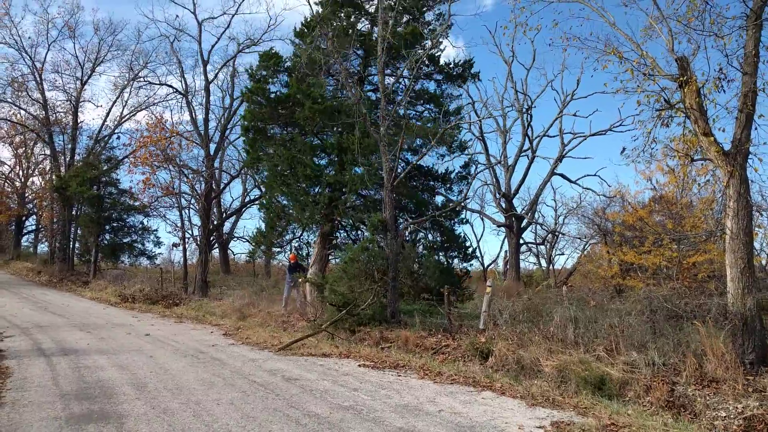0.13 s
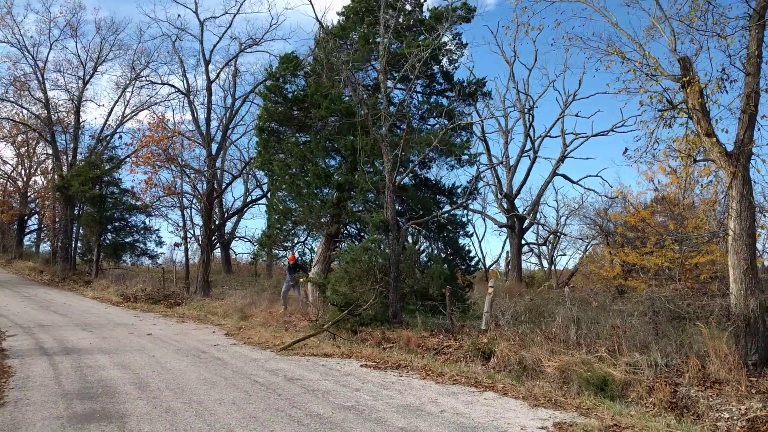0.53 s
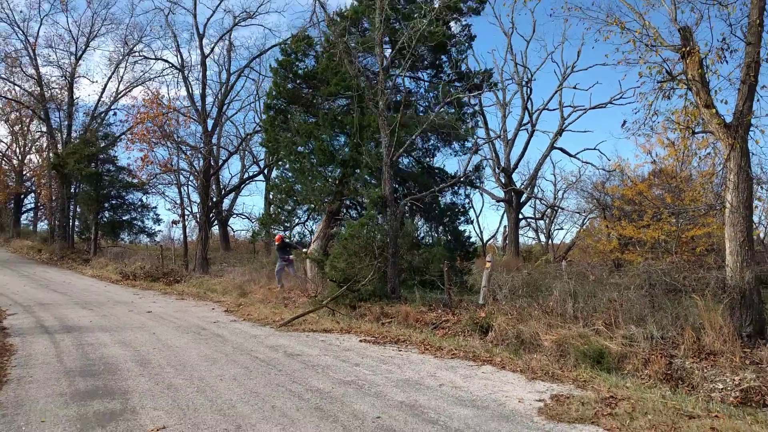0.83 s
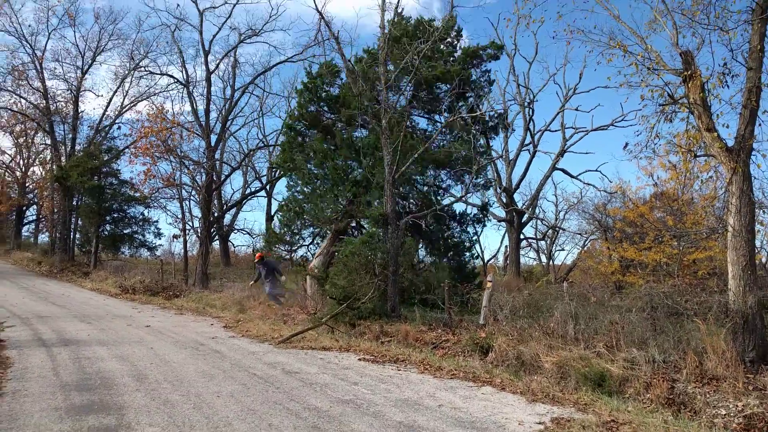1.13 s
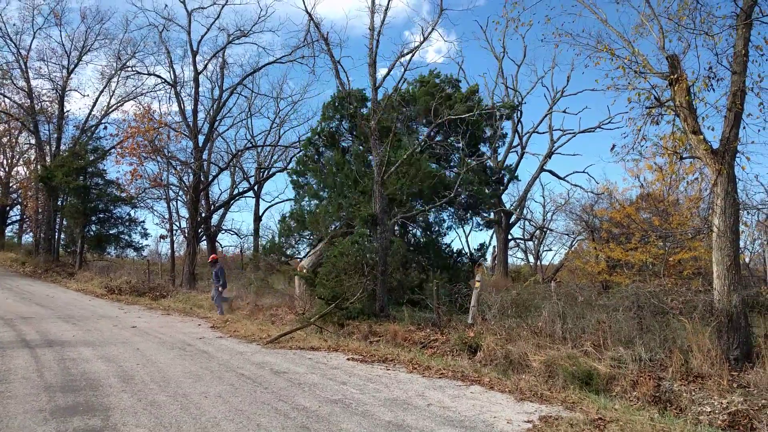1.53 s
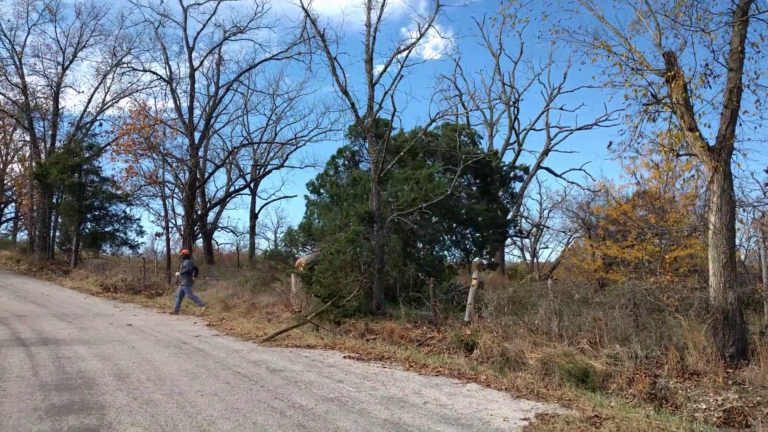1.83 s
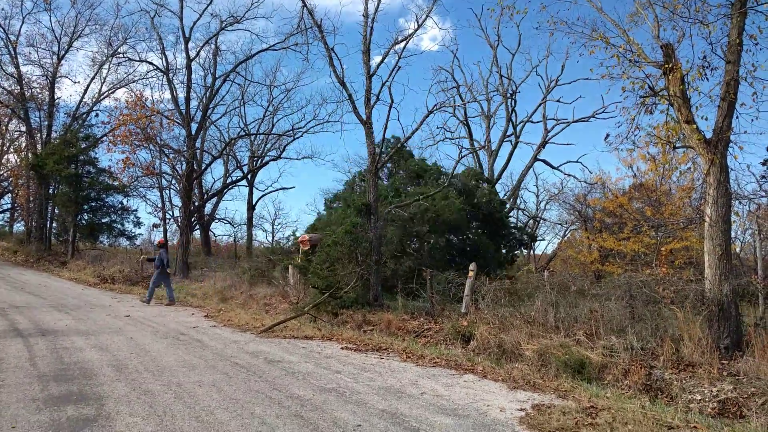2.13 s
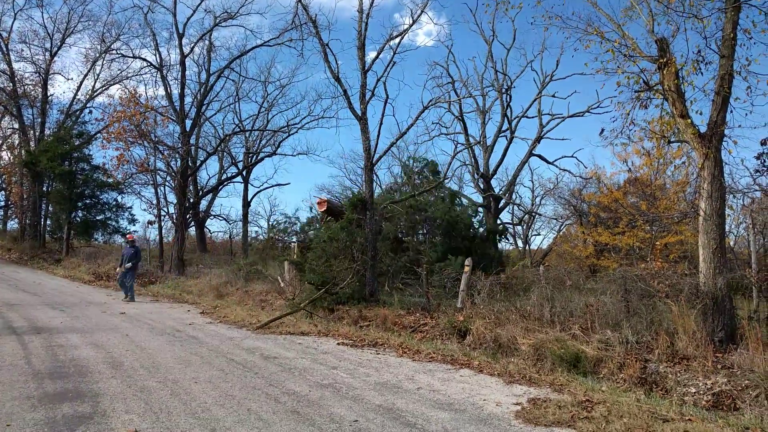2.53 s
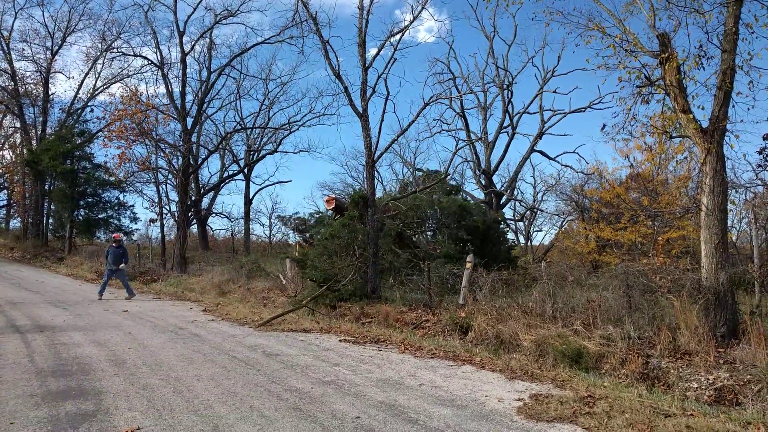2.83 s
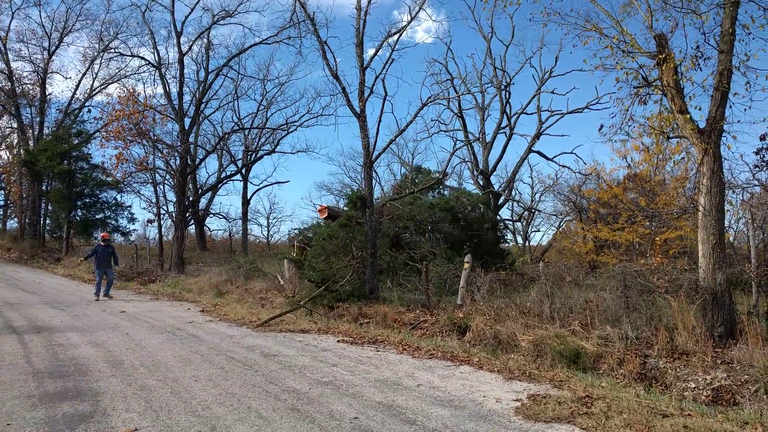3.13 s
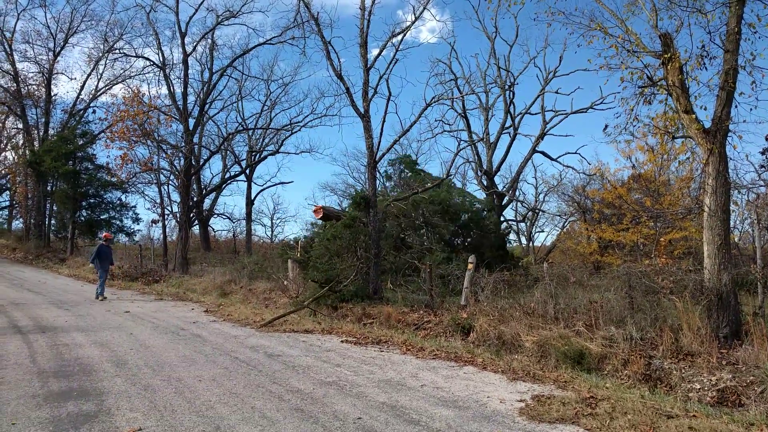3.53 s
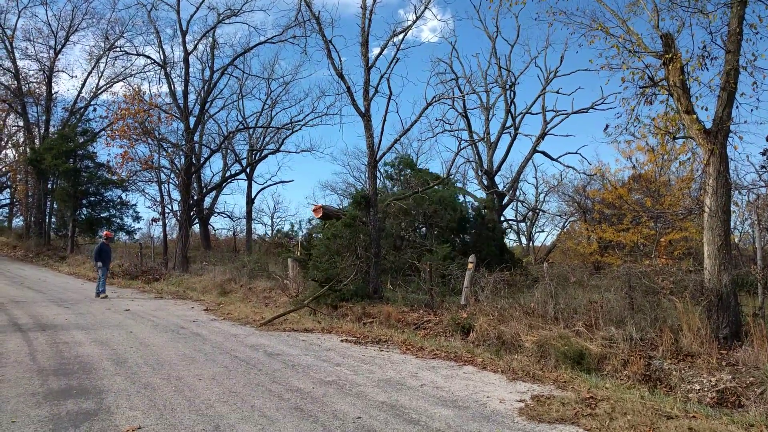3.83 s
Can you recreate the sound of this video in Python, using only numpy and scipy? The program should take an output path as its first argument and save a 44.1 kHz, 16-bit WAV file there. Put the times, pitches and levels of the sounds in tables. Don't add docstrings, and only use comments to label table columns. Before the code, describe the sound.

A tree cracks, creaks and crashes down after a chainsaw finishes its cut outdoors

```python
import sys
import numpy as np
from scipy import signal
from scipy.fft import rfft, irfft, next_fast_len
from scipy.io import wavfile
from scipy.ndimage import map_coordinates

SR = 44100
rng = np.random.default_rng(int(sys.argv[2]) if len(sys.argv) > 2 else 0)


def invert_db(level):
    return 10 ** (np.asarray(level, dtype=float) / 20)


def wav_out(sig):
    wavfile.write(sys.argv[1], SR, np.round(np.clip(np.atleast_2d(sig).T, -1, 1) * 32767).astype(np.int16))


N = 176400


def unit(x):
    return x / np.sqrt(np.mean(x ** 2) + 1e-20)


def loud_unit(x, gate):
    return gate ** 2 * x / np.sqrt(np.sum(gate * x ** 2) / np.sum(gate))


def curves(rows, fade_s=0.0062):
    s, *cols = np.transpose(rows)
    t = np.arange(N) / SR
    fade_in = np.clip((t - s[0]) / fade_s + 1, 0, 1)
    fade_out = np.clip((s[-1] - t) / fade_s + 1, 0, 1)
    return [np.interp(t, s, c) for c in cols] + [fade_in * fade_out]


def wobble(rate_hz):
    knots = rng.standard_normal(int(N * rate_hz / SR) + 4)
    return map_coordinates(knots, [np.arange(N) * rate_hz / SR])


def white():
    return rng.standard_normal(N)


def filtered(x, response):
    m = 2 * next_fast_len(len(x) // 2 + 4096)
    return irfft(rfft(x, m) * response(np.fft.rfftfreq(m, 1 / SR)), m)[:len(x)]


def colour(points):
    def response(hz):
        f, db = np.transpose(points)
        level_db = np.interp(np.log(hz + 1), np.log(f + 1), db)
        cepstrum = irfft(np.log(invert_db(level_db) + 1e-6))
        cepstrum[1:len(hz) - 1] *= 2
        cepstrum[len(hz):] = 0
        return np.exp(rfft(cepstrum))
    return response


def band(f, centre_hz, width_hz):
    return 1j * f * width_hz / (centre_hz ** 2 - f * f + 1j * f * width_hz)


def resonances(peaks):
    def response(f):
        return sum((-1) ** k * invert_db(db) * band(f, hz, width) for k, (hz, width, db) in enumerate(peaks))
    return response


def pulses(rate_hz, jitter, scatter_db):
    turns = np.cumsum(rate_hz) / SR
    chance = rng.standard_normal((1200, 2))[:int(turns[-1])]
    at = np.interp(np.arange(len(chance)) + .5, turns, np.arange(N))
    shift = chance[:, 0] * np.interp(at, np.arange(N), jitter / rate_hz) * SR
    at = np.clip(at + shift, 8, N - 9)
    k = np.arange(-7, 9)
    taps = np.sinc(k - (at % 1)[:, None]) * np.hanning(18)[1:-1] * invert_db(scatter_db * chance[:, 1:])
    clicks = np.bincount((at.astype(int)[:, None] + k).ravel(), taps.ravel(), N)
    return clicks, 2 * np.pi * turns


# (time [s], firing rate [Hz], first order [dB], rasp [dB])
SAW_CUT = [
    (0, 182.6, -23.5, -15),
    (.2, 174.5, -25, -16.5),
    (.39, 170.2, -29, -17.5),
    (.48, 166.2, -23, -18.5),
    (.56, 174.6, -27, -15.5),
    (.62, 181.5, -22, -25.5),
    (.68, 189, -40, -15),
]
# (frequency [Hz], level [dB])
SAW_COLOUR = [(560, -9), (900, -8), (1200, -4), (1900, -6), (2700, -4), (4240, -12.5), (6400, -31),
              (16000, -58)]


def saw():
    chain_hz, slap_s, noise_db = 1500, .0008, -7
    hz, one_db, rasp_db, gate = curves(SAW_CUT, fade_s=.04)
    clicks, phase = pulses(hz, .004, scatter_db=1.5)
    slap = (.5 + .2 * wobble(12.15)) * np.roll(clicks, round(slap_s * SR))
    barks = unit(clicks + slap)
    chain = filtered(white() * (1 + np.cos(phase)), lambda f: f / (f - 1j * chain_hz))
    rasp = loud_unit(filtered(barks + invert_db(noise_db) * chain, colour(SAW_COLOUR)), gate)
    orders_db = (0, -12, -2.5, -19)
    low = invert_db(one_db) * sum(invert_db(db) * np.sin(k * phase) for k, db in enumerate(orders_db, 1))
    return invert_db(rasp_db - 2.5) * rasp + np.sqrt(2) * gate * low


# (time [s], peak [dB], centre [Hz], length [s])
TRUNK_BREAKS = [
    (0.468, -4.5, 1170, 0.0081),
    (0.569, -8.5, 1397, 0.011),
    (0.597, 8, 2010, 0.0056),
    (0.749, 3, 1928, 0.0023),
    (0.764, 7.5, 1280, 0.0033),
    (0.827, -12.5, 1300, 0.0074),
    (0.832, 7, 900, 0.0074),
    (0.865, -22, 1486, 0.0025),
    (0.9, 8, 1368, 0.0033),
]
# (time [s], peak [dB], centre [Hz], length [s])
BRIGHT_SPLITS = [(1.1615, 1, 5060, 0.00067), (1.329, -4, 4140, 0.0012), (1.3553, -19, 3780, 0.0012),
                 (1.3946, 0.5, 4700, 0.0033), (1.4252, -4, 4340, 0.00084), (1.6175, -7.5, 3700, 0.002),
                 (1.2026, -20, 4000, 0.0011), (1.4586, -21, 4000, .001), (2.688, -22, 4040, .002),
                 (3.075, -29.5, 4200, .001), (2.7023, -13, 3960, 0.0049), (3.1285, -12.5, 3900, 0.0051)]
# (time [s], peak [dB], length [s])
BRANCH_BREAKS = [(1.5487, -7, .002), (1.583, -2, 0.0069), (1.655, -7, 0.0015), (1.703, -9, 0.0036),
                 (1.736, 0.5, 0.003), (1.768, -4, 0.0024), (1.793, 3, 0.004), (1.81, 2.5, 0.0012),
                 (1.831, 7.5, 0.0044), (1.886, 1, 0.005), (1.899, -4, 0.0075), (1.949, 0.5, 0.0019),
                 (1.997, -5.5, 0.0065), (2.002, 1.5, 0.0036), (2.013, -8, 0.029), (2.038, 8, 0.002),
                 (2.049, -7.5, 0.0049), (2.079, -10.5, 0.0029), (2.109, -3.5, 0.0049),
                 (2.166, -6.5, 0.0056), (2.1874, 3, 0.0057), (2.216, -4, 0.0033), (2.237, -0.5, 0.0027),
                 (2.248, 0.5, 0.015), (2.2793, -2.5, 0.0066), (2.332, -2, 0.0067), (2.353, -5.5, 0.013),
                 (2.424, -5.5, 0.0066), (2.495, -13, 0.0077), (2.545, -9, 0.01), (2.745, -13.5, 0.004),
                 (2.851, -13, 0.0055), (2.864, -19, 0.0077), (2.938, -15, 0.0059), (3.095, -15, 0.017),
                 (3.161, -15.5, 0.0038), (3.315, -27, 0.0057)]
# (frequency [Hz], level [dB])
SNAP_COLOUR = [(180, -40), (300, -3), (2140, -0.5), (4230, -5.5), (6520, -23.5), (10600, -37.5),
               (16000, -51.5)]


def cracks(rows, ring_db, gain_db, low_hz=0):
    rise_s, tail_s, tail_db, first_click = 0.00023, 0.042, -24.5, 5
    out, t = np.zeros(N + SR), np.arange(8192) / SR
    rise = 1 - np.exp(-t / rise_s)

    def wood(f):
        return colour(SNAP_COLOUR)(f) * ((f + 1) / (f + 1 - 1j * low_hz)) ** 2

    for s, db, hz, length_s in rows:
        splinters = rng.standard_normal(len(t)) * rise * np.exp(-t / max(length_s, .0006))
        splinters[round(SR / 2000)] = first_click
        burst = filtered(splinters, lambda f: wood(f) * (1 + invert_db(ring_db) * band(f, hz, .4 * hz)))
        echoes = unit(filtered(rng.standard_normal(len(t)), lambda f: wood(f) / (1 + 1j * f / 5000)))
        tail = echoes * rise * np.exp(-t / tail_s)
        out[round(s * SR):][:len(t)] += invert_db(db + gain_db) * (burst / np.abs(burst).max() + invert_db(tail_db) * tail)
    return out[:N]


def breaks():
    thin_hz, branch_hz, spread_db = 1300, 2237, 1
    trunk = cracks(TRUNK_BREAKS, ring_db=4, gain_db=1.5)
    splits = cracks(BRIGHT_SPLITS, ring_db=14, gain_db=1.5, low_hz=thin_hz)
    rows = [(s, db, branch_hz * invert_db(spread_db * rng.normal()), d) for s, db, d in BRANCH_BREAKS]
    branches = cracks(rows, ring_db=-5.5, gain_db=0.5, low_hz=thin_hz)
    return trunk + splits + branches


# (time [s], slip rate [Hz], level [dB], unevenness [0-1])
TEAR_SLIPS = [
    (.62, 85, -19, 0.4),
    (.88, 96, -43.5, 0.2),
    (.93, 150, -19.5, 0.4),
    (1.02, 225, -18.5, .25),
    (1.1, 200, -20, .3),
    (1.17, 215, -23.5, 0.16),
    (1.24, 400, -26.5, 0),
]
# (centre [Hz], width [Hz], level [dB])
HINGE_RINGS = [(876, 1150, -3.5), (1457, 700, 1), (1894, 560, 1), (4200, 1200, -14.5)]


def tear():
    wood = resonances(HINGE_RINGS)
    rate_hz, db, uneven, gate = curves(TEAR_SLIPS)
    clicks, _ = pulses(rate_hz, uneven, scatter_db=2)
    slips = filtered(clicks, lambda f: wood(f) ** 2) / np.sqrt(rate_hz)
    return invert_db(db) * loud_unit(slips, gate)


# (time [s], slip rate [Hz], first order [dB], second order [dB], upper orders [dB], fifth order [dB])
CREAK_SLIPS = [(.94, 94.5, -52, -28.5, -26.5, -47.5), (1.05, 97.07, -44.5, -21.5, -19.5, -43),
               (1.09, 118.3, -28.5, -32.5, -21.5, -55), (1.14, 150.5, -37, -36, -22, -36),
               (1.204, 174.4, -28.5, -30.5, -20.5, -22.5), (1.26, 182.9, -24.5, -33, -27, -26),
               (1.325, 195.3, -24.5, -30.5, -20.5, -24), (1.39, 197.3, -29, -34, -27, -28.5),
               (1.47, 198.8, -29.5, -22.5, -27, -31), (1.53, 196.5, -30, -37, -38.5, -27.5),
               (1.585, 203.6, -34, -36, -38.5, -31.5), (1.625, 219.7, -29, -37, -37, -54),
               (1.67, 237.5, -36, -36, -39, -49.5), (1.72, 247.3, -42, -54, -44.5, -50.5),
               (1.92, 237.6, -38, -39, -47.5, -50.5)]
# (centre [Hz], width [Hz], level [dB])
STUMP_RINGS = [(585, 140, -5), (1300, 400, 0), (1780, 380, -2)]


def creak():
    stump = resonances(STUMP_RINGS)
    hz, one_db, two_db, top_db, five_db, gate = curves(CREAK_SLIPS)
    clicks, phase = pulses(hz, 0.0017, scatter_db=0.0)
    rings = filtered(clicks, lambda f: stump(f) * np.abs(stump(f)) ** .5) / np.sqrt(hz)
    tops = invert_db(top_db + 2 + 1.2 * wobble(15)) * loud_unit(rings, gate)
    low = sum(invert_db(db) * np.sin(k * phase) for k, db in ((1, one_db), (2, two_db), (5, five_db)))
    return tops + np.sqrt(2) * gate * low


# (time [s], peak [dB])
FIBRE_SNAPS = [(0.116, -11), (0.15, -10), (0.1884, -10), (0.2863, -10.5), (0.3394, -13.5), (0.4094, -9.5),
               (0.4437, -10.5), (0.5044, -10), (0.5267, -10.5), (0.5387, -14), (0.6128, -0.5), (0.6234, -4),
               (0.6393, -13.5), (0.6516, -19), (0.6742, -9), (0.6893, -20), (0.7008, -8.5), (0.7123, -11),
               (0.7257, -2.5), (0.7352, -5.5), (0.778, -13.5), (0.789, -19.5), (0.8014, -14.5),
               (0.8167, -5), (0.8566, -7.5), (0.876, -11), (0.8848, -3), (0.9117, 1), (0.9204, -5.5),
               (0.9285, -6), (0.9424, -3), (0.9475, -4.5), (0.9543, 2), (0.9635, -4), (0.9701, -5),
               (0.976, -12), (0.9811, -8.5), (0.986, -9), (0.992, -15), (0.9971, -7.5), (1.0175, -9),
               (1.0174, -4), (1.027, -7.5), (1.0475, -9.5), (1.068, -15)]


def fibres():
    ring_hz, ring_s, snap_db = 1380, .0013, -7
    out, t = np.zeros(N + SR), np.arange(1024) / SR
    for s, db in FIBRE_SNAPS:
        shape = t / ring_s * np.exp(1 - t / ring_s)
        ring = np.sin(2 * np.pi * ring_hz * invert_db(.5 * rng.normal()) * t) * shape ** 2
        snap = unit(filtered(rng.standard_normal(len(t)), colour(SNAP_COLOUR))) * np.exp(-t / ring_s)
        out[round(s * SR):][:len(t)] += invert_db(db) * (ring + invert_db(snap_db) * snap)
    return out[:N]


# (time [s], peak [dB], centre [Hz])
THUD_BLOWS = [(0.601, -9, 282), (.768, -8.5, 337), (0.835, 6.5, 580), (.845, -9, 760), (0.904, -3, 343),
              (.91, -4.5, 684), (1.833, -1.5, 750), (1.89, -12, 800), (2.189, -7.5, 700), (2.253, -20, 186),
              (2.251, -9.5, 800), (2.548, -11.5, 805), (2.808, -23, 96), (2.821, -22, 95),
              (2.905, -25.5, 129), (2.94, -26.5, 109), (3.003, -27.5, 136), (3.16, -28, 103),
              (3.327, -24.5, 98)]


def thuds():
    decay_s = 0.022
    out, t = np.zeros(N + SR), np.arange(4096) / SR
    for s, db, hz in THUD_BLOWS:
        push = rng.standard_normal(len(t))
        push[40] += 3e4 / hz
        body = filtered(push * np.exp(-t / decay_s), lambda f: band(f, hz, hz) ** 2)
        out[round(s * SR):][:len(t)] += invert_db(db) * body / np.abs(body).max()
    return out[:N]


# (time [s], level [dB])
RUSTLE_LEVEL = [(.66, -23.5), (.95, -28.5), (1.2, -29), (1.5, -31.5), (1.68, -26.5), (1.85, -21),
                (1.93, -23.5), (2.01, -18.5), (2.1, -21.5), (2.26, -23.5), (2.45, -24.5), (2.6, -31.5),
                (2.8, -36), (3.05, -39), (3.13, -40), (3.3, -43), (3.47, -51.5), (4, -63.5)]
# (frequency [Hz], level [dB])
LEAF_COLOUR = [(180, -58), (300, -27.5), (762, -9.5), (1870, -1), (4230, -2), (6620, -19), (16000, -48)]


def crown():
    db, gate = curves(RUSTLE_LEVEL, fade_s=1.0)
    struck = rng.random(N) < 500 / SR * invert_db(5 * wobble(25))
    size_db = 3.5 * np.minimum(rng.exponential(size=N), np.pi)
    ticks = struck * invert_db(size_db) * rng.choice([-1, 1], N)
    hiss = white() * invert_db(2.5 * wobble(36.0))
    leaves = unit(filtered(invert_db(-0.5) * unit(ticks) + hiss, colour(LEAF_COLOUR)))
    return gate * invert_db(db + 2.07 * wobble(18)) * leaves


# (time [s], firing rate [Hz], level [dB])
IDLE_RUN = [
    (2.5, 49.9, -48),
    (3.1, 46.57, -52),
    (3.5, 47.34, -51),
    (3.75, 43.25, -52),
    (4, 42.6, -52),
]
# (centre [Hz], width [Hz], level [dB])
MUFFLER_RINGS = [(170, 170, -1), (310, 150, -1), (570, 300, 0)]


def idle():
    muffler, top_hz = resonances(MUFFLER_RINGS), 720
    hz, db, gate = curves(IDLE_RUN)
    pops, _ = pulses(hz, .025, scatter_db=2)
    puffs = filtered(pops, lambda f: muffler(f) ** 2 / (1 + (f / top_hz) ** 10))
    return invert_db(db) * loud_unit(puffs, gate)


# (time [s], level [dB])
GROUND_LEVEL = [(0, -48), (.55, -45.5), (.9, -32), (1.25, -41), (1.5, -49.5), (1.85, -44.5), (2.4, -44.5),
                (2.65, -45.5), (2.95, -50), (3.2, -54), (3.45, -54.5), (3.7, -64.5), (4, -66.5)]
# (frequency [Hz], level [dB])
RUMBLE_COLOUR = [(15, -33.5), (25, -39), (53, -10), (97, -1), (500, -6.5), (650, -28), (1100, -120)]


def rumble():
    db, _ = curves(GROUND_LEVEL)
    return invert_db(db + 8.0 + 3.66 * wobble(30)) * unit(filtered(white(), colour(RUMBLE_COLOUR)))


# (frequency [Hz], level [dB])
AIR_COLOUR = [(60, -11), (300, -10.5), (800, -32.5), (4000, -31), (6500, -45.5), (16000, -57)]


def air():
    return invert_db(-50.5) * unit(filtered(white(), colour(AIR_COLOUR)))


# (frequency [Hz], t60 [s])
WOODS_DECAY = [(200, 1), (2000, 0.49), (8000, 0.018)]


def woods(x):
    hz, t, z = signal.stft(rng.standard_normal(SR // 2), SR, nperseg=256)
    f, t60_s = np.transpose(WOODS_DECAY)
    decay = invert_db(-60 * t / np.interp(hz, f, t60_s)[:, None])
    tail = signal.istft(z * decay, SR, nperseg=256)[1]
    return signal.fftconvolve(x, tail / np.linalg.norm(tail))[:N]


def scene():
    snaps = breaks()
    tones = saw() + tear() + creak() + fibres()
    echoes = invert_db(-17) * woods(snaps) + invert_db(-14) * woods(tones)
    return (snaps + tones + echoes + thuds() + crown() + idle() + rumble() + air())[None]


def top_cut(x):
    return signal.sosfilt(signal.butter(12, 16520, fs=SR, output="sos"), x)


# (centre [Hz], width [Hz], depth [0-1])
PATH_DIPS = [(384.3, 178, 0.57), (3162, 1730, 0.64), (6630, 2000, 0.63)]


def record(dry):
    clip_top, clip_hard = .72, 12

    def path(f):
        return np.prod([1 - min(depth, .95) * band(f, hz, width) for hz, width, depth in PATH_DIPS], axis=0)

    x = filtered(dry[0], path)
    x = filtered(x, lambda f: f / (f - 45j))
    x = x / (1 + np.abs(x / clip_top) ** clip_hard) ** (1 / clip_hard)
    return top_cut(x[None])


dry = scene()
out = record(dry)
wav_out(out)
```